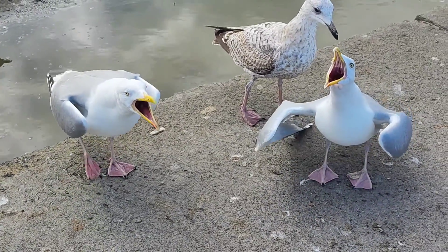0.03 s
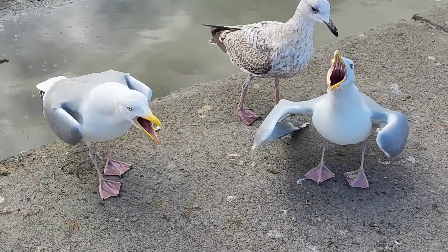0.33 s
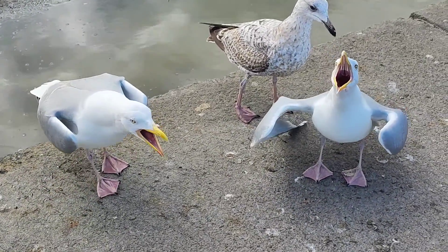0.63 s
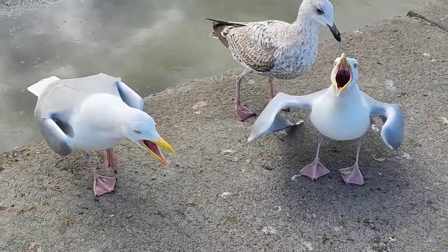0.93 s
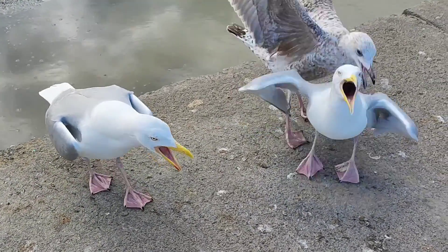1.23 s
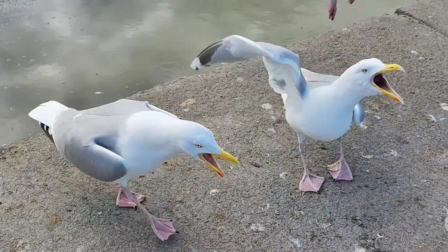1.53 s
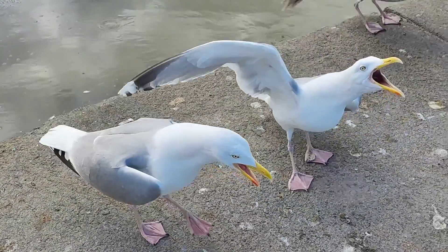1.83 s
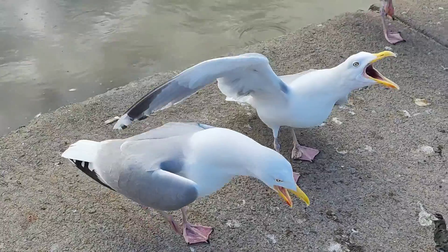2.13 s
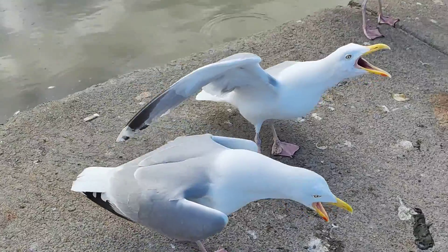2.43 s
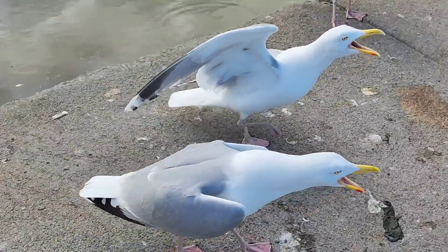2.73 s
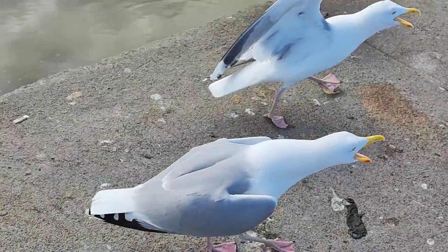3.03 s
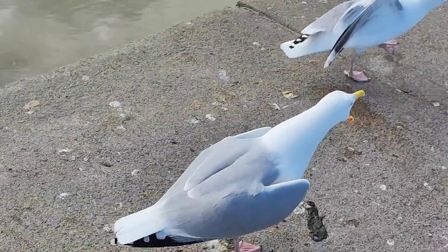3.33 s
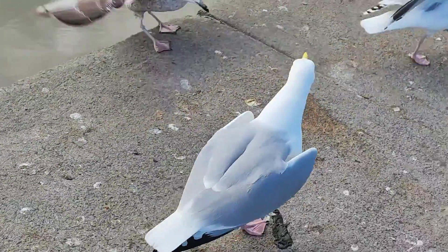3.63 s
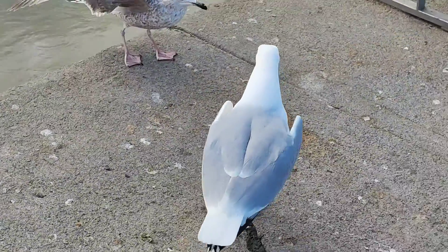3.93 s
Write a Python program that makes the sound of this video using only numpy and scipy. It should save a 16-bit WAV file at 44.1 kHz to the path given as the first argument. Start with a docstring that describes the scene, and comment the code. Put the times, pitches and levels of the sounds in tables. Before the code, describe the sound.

Two gulls call loudly close by from 0.1 seconds, each about three times a second, overlapping. One gives raspy, falling cries, the other sharp yelps that lift and drop. Between 3.2 and 3.6 seconds the yelping gull gives two higher cries and stops, while the first calls on to about 4 seconds. Behind them are a weak echo, three barely audible distant hoots and faint wind rising after 2.5 seconds.

```python
"""Two gulls call against each other, close by on a concrete slipway.
From 0.1 s each call breaks out as a rasp, locks into a clear tone and ends in a croak. The crouching
gull lets its tone fall; the gull with spread wings lifts it, flips into a yelp and drops. After 3.2 s
that gull walks off with two higher cries, while the first calls on to the end and the light wind rises.
Throughout, a weak harbour echo follows the calls; three faint hoots come from far away."""
import sys
import numpy as np
from scipy import signal
from scipy.fft import rfft, irfft
from scipy.io import wavfile
from scipy.ndimage import map_coordinates

SR = 44100
rng = np.random.default_rng(int(sys.argv[2]) if len(sys.argv) > 2 else 0)


def unload_wav(signal):
    """Save mono or channel-first audio to the path in sys.argv[1] as 16-bit WAV at rate SR, clipped to [-1, 1]."""
    wavfile.write(
        sys.argv[1],
        SR,
        np.round(np.clip(np.atleast_2d(signal).T, -1, 1) * 32767).astype(np.int16),
    )


N = 176400

# Cries of the crouching gull; the two highest are the other gull walking off.
# rasp_start_s, tone_start_s, end_s, pitch_hz, rasp_db, tone_db, extra_h2_db, extra_h3_db, extra_upper_db
FALLING_CRIES = [ (0.082, 0.127, .303, 1107, -25.5, -24, 10, 8.5, 6.5),
                 (0.419, .47, .642, 1113, -28, -19, 1.5, 2, 4.5),
                 (0.763, 0.853, .988, 1094, -29, -16, -0.5, 0, 1.5),
                 (1.118, 1.189, 1.33, 1099, -26, -14.5, -2, -5, -4),
                 (1.471, 1.549, 1.68, 1099, -20.5, -17.5, 3, 1, 2),
                 (1.805, 1.897, 2.052, 1078, -24.5, -20, -2, -5.5, 2),
                 (2.213, 2.277, 2.415, 1090, -26.5, -17.5, 1, -1, -4),
                 (2.554, 2.616, 2.763, 1119, -26.5, -15.5, 5, -3.5, -14.5),
                 (2.878, 2.941, 3.086, 1104, -25, -14.5, 0.5, -13.5, -19.5),
                 (3.215, 3.271, 3.421, 1083, -23.5, -21, 3, -7, -7.5),
                 (3.246, 3.278, 3.375, 1138, -30, -12.5, -11.5, -14.5, -9.5),
                 (3.454, 3.498, 3.565, 1275, -38.5, -19.5, 0, -30.5, -9.5),
                 (3.563, 3.626, 3.758, 1100, -24, -16.5, 0.5, -7, -5),
                 (3.879, 3.951, 4.09, 1091, -25, -18.5, 5.5, -10, -1)]
# Calls of the gull with spread wings.
# wail_start_s, fall_start_s, end_s, wail_hz, yelp_hz, fall_hz, rasp_db, wail_db, yelp_db, fall_db,
# hoarse_db, wail_extra_h2_db, wail_extra_upper_db, fall_extra_h2_db, fall_extra_upper_db
YELPING_CALLS = [ (0.122, .207, .268, 1191, 1378, 1103, -17, -15.5, -8.5, -21.5, -32, 5, 1.5, -6.5, -5.5),
                 (0.409, 0.491, .55, 1194, 1335, 1099, -17.5, -15.5, -8, -27.5, -34, 5, 4, 2, 1),
                 (0.693, 0.781, .838, 1181, 1349, 1098, -20, -16.5, -7.5, -28, -30.5, 3, 5.5, 3.5, 0.5),
                 (0.989, 1.066, 1.122, 1192, 1349, 1096, -22.5, -18.5, -7.5, -29, -50, 4.5, 2.5, 5, 2),
                 (1.266, 1.351, 1.407, 1196, 1360, 1092, -22, -19.5, -9, -29.5, -43, 6, 5, 3.5, 2.5),
                 (1.557, 1.651, 1.712, 1297, 1330, 1212, -16.5, -15, -16, -28, -42, -3, 13.5, 0, 0),
                 (1.845, 1.932, 1.988, 1170, 1356, 1109, -18, -20, -9.5, -27.5, -36, 6, 13, 4.5, 0),
                 (2.136, 2.214, 2.276, 1160, 1230, 1103, -21, -30.5, -15, -25, -40, 18, 19.5, 0.5, -4.5),
                 (2.423, 2.498, 2.562, 1147, 1210, 1131, -23.5, -28, -23, -20.5, -48.5, 21, 19, -2, -10),
                 (2.718, 2.794, 2.85, 1156, 1199, 1104, -24.5, -24.5, -17.5, -19.5, -47, 12.5, 12, -9, -12),
                 (3.014, 3.085, 3.138, 1214, 1378, 1128, -27, -19, -18, -18, -41, 5, 9.5, -21, -14)]
# Pitch glides: progress_share, pitch_ratio
CRY_CONTOUR = [(0, 1.055), (.6, .985), (.78, .965), (.9, .92), (1, 0.73)]
WAIL_CONTOUR = [(.25, .968), (1, 1.035)]
FALL_CONTOUR = [(0, 1.025), (.6, .985), (.8, .95), (1, 0.868)]
# Voice spectra, harmonic 1 upwards: relative_db
ONSET_DB = [-3, -20, -22, -30, -44.5, -41.5, -46.5]
OPEN_BEAK_DB = [-2.5, -11.5, -4, -18, -31, -28.5, -28, -39.5, -37.5, -34.5, -38]
LATE_WAIL_DB = [0, -12, -36, -39, -42, -53.5]
FALL_DB = [0, 2.5, 1.5, -7.5, -14.5, -11.5, -14.5, -31, -26, -23.5, -25.5]
# Throat resonances: frequency_hz, relative_db
CRY_FORMANTS = [(300, -28), (720, -17), (1000, 7), (1400, 3.5), (2100, 0), (3400, -9.5), (4400, -22),
                (14000, -44)]
YELP_FORMANTS = [(300, -45.5), (720, -15), (1350, 7), (1850, -6), (2750, -1), (3400, -11.5), (5400, -17.5),
                 (7300, -27), (14000, -45)]
# Two microphone ports: frequency_hz, left_minus_right_db, left_lead_rad
PORT_RESPONSE = [(1150, -2.2, -.7), (2200, -2, -.7), (4200, -6, -1.8), (5400, -3, -1), (6500, 8, -2.4),
                 (7700, -4, -3.2), (12000, 1, -4.4)]
# Distant hoots: middle_s, pitch_hz, level_db
FAR_HOOTS = [(1.17, 389.5, -53), (1.5, 188.6, -48.5), (3.2, 565, -51)]
# Noise spectra: frequency_hz, relative_db
WIND_SPECTRUM = [(124, -3.5), (295, -10), (450, -10), (600, -28.5), (1320, -100)]
AIR_SPECTRUM = [(500, -24.5), (1300, -16), (14000, -41.5)]
# Wind strength: time_s, level_db
WIND_RISE = [(2.5, -46), (4.0, -40)]

HARMONICS, ROLL_OFF_DB, VOICE_TOP_HZ = len(FALL_DB), -6, 12200
CRY_RISE_S, CRY_FADE_S, WAIL_RISE_S, FALL_FADE_S = .008, .03, .024, .019
LIFT_S, YELP_S, FLIP_S = .016, .019, .006
YELP_ARCH = .532  # share of the way back to the wail pitch at the yelp's ends
YELP_DULL_DB = (-2.5, -14.5)  # harmonic 2, upper harmonics
JITTER, JITTER_ENDS, JITTER_HZ, WOBBLE_DB, WOBBLE_HZ = .0055, .011, 346, 3.5, 30
HALF_PITCH_DB, HALF_PITCH_DECAY_S = -21, .025
CRY_HOARSE_DB, HOARSE_FADE_DB = -57, -20.5
# Rasp pairs: start, end. Throat tension scales the base pulse rates.
CRY_BASE_HZ, CRY_SCATTER, CRY_SWELL_DB = (463.6, 564.3), (.11, .04), -7
YELP_BASE_HZ, YELP_SCATTER, YELP_SWELL_DB = (506.8, 633.6), (.2, .14), -15
YELP_RASP_S, RASP_EDGE_S = .041, .0076
RASP_NOISE, RASP_CLIMB, RASP_WANDER = .18, .2, .04
LURCH_HZ, LUMP_HZ, LUMP_DEPTH = 150, 110, .18
CROAK_S, CROAK_DB, CROAK_BASE_HZ = .011, -15, 403.94
PORT_SPREAD = .085  # share by which each bird's port delay departs from the mean
NEAR_DB, NEAR_T60_S, TAIL_DB, TAIL_T60_S, WALL_S, WALL_DB = -11, .015, -27.5, .6, .16, -33.5
GUST_DB, GUST_HZ, AIR_DB, NOISE_CORRELATION = 2.8, 10, -49.5, .68
BAND_LIMIT_HZ = 14500


def falling_cries():
    """Rasp, a sinking tone that brightens as the beak opens, croak."""
    out = np.zeros(N)
    for start_s, lock_s, end_s, pitch_hz, rasp_db, tone_db, *extra_db in FALLING_CRIES:
        add(out, *rasp(start_s, lock_s, rasp_db, CRY_BASE_HZ, CRY_SCATTER, CRY_FORMANTS, CRY_SWELL_DB))
        progress, envelope = section(lock_s, end_s, CRY_RISE_S, CRY_FADE_S)
        beak = ramp(progress)[:, None]
        levels_db = tone_db + (1 - beak) * roll_off(ONSET_DB) + beak * OPEN_BEAK_DB + boost(*extra_db)
        hz = pitch_hz * curve(CRY_CONTOUR, progress)
        add(out, lock_s - CRY_RISE_S / 2, envelope * tone(hz, levels_db, CRY_HOARSE_DB))
        add(out, *croak(end_s, rasp_db, CRY_FORMANTS))
    return out


def yelping_calls():
    """Rasp, rising wail, slide up to a short yelp, flip down into a bright fall, croak."""
    out = np.zeros(N)
    for (lock_s, drop_s, end_s, wail_hz, yelp_hz, fall_hz, rasp_db, wail_db, yelp_db, fall_db,
         hoarse_db, wail_h2_db, wail_upper_db, fall_h2_db, fall_upper_db) in YELPING_CALLS:
        start_s, lift_s = lock_s - YELP_RASP_S, drop_s - YELP_S
        add(out, *rasp(start_s, lock_s, rasp_db, YELP_BASE_HZ, YELP_SCATTER,
                       YELP_FORMANTS, YELP_SWELL_DB))
        progress, envelope = section(lock_s, end_s, WAIL_RISE_S, FALL_FADE_S)
        t = lock_s + progress * (end_s - lock_s)
        spans_s = [(lock_s, lift_s), (lift_s, drop_s), (drop_s, end_s)]
        wail, yelp, fall = (np.clip((t - a) / (b - a), 0, 1) for a, b in spans_s)
        up, down = ramp((t - lift_s) / LIFT_S + .5), ramp((t - drop_s) / FLIP_S + .5)
        shares = [1 - up, up * (1 - down), up * down]  # wail, yelp, fall
        pitches_hz = [wail_hz * curve(WAIL_CONTOUR, wail),
                      yelp_hz - YELP_ARCH * (yelp_hz - wail_hz) * (2 * yelp - 1) ** 2,
                      fall_hz * curve(FALL_CONTOUR, fall)]
        push = ramp(wail)[:, None]
        bright_db = boost(wail_h2_db, wail_upper_db)
        spectra_db = [
            wail_db + (1 - push) * roll_off(ONSET_DB) + push * roll_off(LATE_WAIL_DB) + bright_db,
            yelp_db + roll_off(ONSET_DB) + bright_db + boost(*YELP_DULL_DB),
            fall_db + np.array(FALL_DB) + boost(fall_h2_db, fall_upper_db)]
        gains = sum(share[:, None] * amp(db) for share, db in zip(shares, spectra_db))
        hz = sum(share * pitch for share, pitch in zip(shares, pitches_hz))
        add(out, lock_s - WAIL_RISE_S / 2, envelope * tone(hz, 20 * np.log10(gains), hoarse_db))
        add(out, *croak(end_s, rasp_db, YELP_FORMANTS))
    return out


def tone(hz, levels_db, hoarse_db):
    """Locked voice: harmonics shakiest at the ends, fading half-pitch lines, a hoarse puff per cycle."""
    n = len(hz)
    progress = np.linspace(0, 1, n)
    shake = JITTER + JITTER_ENDS * (2 * progress - 1) ** 4
    phase = 2 * np.pi * np.cumsum(hz * (1 + shake * drift(n, JITTER_HZ))) / SR
    gains = amp(levels_db) / (1 + (np.outer(hz, np.arange(HARMONICS) + 1) / VOICE_TOP_HZ) ** 20)
    voice = sum(gain * amp(WOBBLE_DB * min(k / 2, 1) * drift(n, WOBBLE_HZ)) * np.cos((k + 1) * phase)
                for k, gain in enumerate(gains.T))
    half_pitch = sum(np.cos((k + .5) * phase) / k ** 2 for k in range(1, 5))
    voice += gains[:, 0] * amp(HALF_PITCH_DB) * np.exp(-np.arange(n) / SR / HALF_PITCH_DECAY_S) * half_pitch
    puffs = np.diff(rng.standard_normal(n) * (1 + np.cos(phase)), prepend=0)
    hoarse = amp(hoarse_db + HOARSE_FADE_DB * progress) * throat(puffs, YELP_FORMANTS)
    return np.sqrt(2) * voice + hoarse


def rasp(start_s, end_s, level_db, base_hz, scatter, formants, swell_db):
    """Uneven pulses swell and speed up as the throat's resonances climb. Returns start_s, sound."""
    t = np.arange(0, end_s - start_s + RASP_EDGE_S, 1 / SR)
    n, progress = len(t), np.minimum(t / (end_s - start_s), 1)
    lurch = np.interp(progress, [0, 1], scatter) * drift(n, LURCH_HZ)
    cycles = np.cumsum(np.interp(progress, [0, 1], base_hz) * (1 + lurch)) / SR
    pulses = unit(np.diff(np.floor(cycles), prepend=0)) + RASP_NOISE * rng.standard_normal(n)
    voice = throat(pulses * np.exp(LUMP_DEPTH * drift(n, LUMP_HZ)), formants)
    tension = 1 - RASP_CLIMB * (1 - progress) + RASP_WANDER * drift(n, LUMP_HZ / 2)
    voice = map_coordinates(voice, [np.cumsum(tension)], mode="mirror")  # scales all frequencies
    envelope = ramp(t / RASP_EDGE_S) * ramp((t[-1] - t) / RASP_EDGE_S)
    return start_s, amp(level_db + swell_db * (1 - progress) ** 2) * envelope * voice


def croak(end_s, rasp_db, formants):
    """The voice breaks up again as the call runs out."""
    base_hz = (CROAK_BASE_HZ, CROAK_BASE_HZ)
    return rasp(end_s - CROAK_S, end_s, rasp_db + CROAK_DB, base_hz, YELP_SCATTER, formants, swell_db=0)


def throat(drive, formants, size=2048):
    """Throat resonances as a minimum-phase filter; output at rms 1."""
    log_gain = np.log(amp(spectrum(formants, abs(np.fft.fftfreq(size, 1 / SR)))))
    ring = np.fft.ifft(np.exp(np.conj(signal.hilbert(log_gain)))).real
    return unit(signal.fftconvolve(drive, ring)[:len(drive)])


def ports(bird, side):
    """Each microphone port hears a bird with its own colour and delay; the birds stand apart."""
    hz = np.fft.rfftfreq(2 * N, 1 / SR)
    lead_rad = (1 + side * PORT_SPREAD) * spectrum(PORT_RESPONSE, hz, column=2)
    left = amp(spectrum(PORT_RESPONSE, hz) / 2) * np.exp(.5j * lead_rad)
    rms_gain = np.sqrt((abs(left) ** 2 + abs(left) ** -2) / 2)
    return irfft(rfft(bird, 2 * N) * np.array([left, 1 / left]) / rms_gain)[:, :N]


def harbour(calls):
    """Scatter from nearby ground, a thin open-air tail, one far wall."""
    t = np.arange(SR) / SR
    response = np.zeros((2, SR))
    for channel in response:
        for db, t60_s in [(NEAR_DB, NEAR_T60_S), (TAIL_DB, TAIL_T60_S)]:
            decay = unit(rng.standard_normal(SR) * np.exp(-np.log(1000) * t / t60_s))
            add(channel, .004, amp(db) * decay / np.sqrt(SR))
        add(channel, WALL_S, amp([WALL_DB]))
    return signal.fftconvolve(calls[None], response, axes=1)[:, :N]


def wind():
    """Low gusty wind, slightly stronger on the right."""
    gust_band = np.exp(-(np.fft.rfftfreq(N, 1 / SR) / GUST_HZ) ** 2)
    gusts = unit(irfft(rfft(rng.standard_normal(N)) * gust_band, N))
    level_db = curve(WIND_RISE, np.arange(N) / SR) + GUST_DB * gusts
    return noise(WIND_SPECTRUM) * amp(level_db) * amp([[-1], [1]])


def hoots():
    """Soft, slightly sinking tones from far away."""
    length_s, sag = .3, .097
    out, position = np.zeros(N), np.linspace(-.5, .5, int(length_s * SR))
    for middle_s, hz, db in FAR_HOOTS:
        phase = 2 * np.pi * np.cumsum(hz * (1 - sag * position)) / SR
        add(out, middle_s - length_s / 2, 2 * amp(db) * np.cos(np.pi * position) ** 2 * np.sin(phase))
    return out


def air():
    """Steady hiss of still air."""
    return amp(AIR_DB) * noise(AIR_SPECTRUM)


def noise(colour):
    """Coloured stereo noise, partly shared by the ports."""
    left, other = rfft(rng.standard_normal((2, N)))
    right = NOISE_CORRELATION * left + np.sqrt(1 - NOISE_CORRELATION ** 2) * other
    return unit(irfft(np.array([left, right]) * amp(spectrum(colour, np.fft.rfftfreq(N, 1 / SR))), N))


def section(start_s, end_s, rise_s, fade_s):
    """Progress 0-1 and envelope of a tone, overlapping its neighbours slightly."""
    t = np.arange(-rise_s / 2, end_s - start_s + FLIP_S / 2, 1 / SR)
    return np.clip(t / (end_s - start_s), 0, 1), ramp(t / rise_s + .5) * ramp((t[-1] - t) / fade_s)


def roll_off(levels_db):
    """Extends a spectrum by ROLL_OFF_DB per harmonic."""
    k, last = np.arange(HARMONICS), len(levels_db) - 1
    return np.array(levels_db)[np.minimum(k, last)] + ROLL_OFF_DB * np.maximum(k - last, 0)


def boost(*overtones_db):
    """Extra dB from harmonic 2 up; the last value holds for the rest."""
    return np.pad([0, *overtones_db], (0, HARMONICS - 1 - len(overtones_db)), "edge")


def drift(n, cutoff_hz):
    """Smooth random motion, rms about 1."""
    hz = np.fft.rfftfreq(2 ** 14, 1 / SR)
    return np.resize(unit(irfft(rfft(rng.standard_normal(2 ** 14)) / (1 + (hz / cutoff_hz) ** 4))), n)


def spectrum(points, hz, column=1):
    """Table lookup over log frequency."""
    table = np.transpose(points)
    return np.interp(np.log(hz + 1), np.log(table[0] + 1), table[column])


def curve(points, x):
    """Linear table lookup."""
    return np.interp(x, *np.transpose(points))


def ramp(x):
    """Soft step from 0 to 1."""
    return np.sin(np.pi / 2 * np.clip(x, 0, 1)) ** 2


def amp(db):
    """Decibels to gain."""
    return 10 ** (np.asarray(db) / 20)


def unit(x):
    """Scales to rms 1."""
    return x / np.sqrt(np.mean(x ** 2) + 1e-20)


def add(mix, start_s, sound):
    """Mixes a sound in at start_s."""
    part = mix[max(round(start_s * SR), 0):][:len(sound)]
    part += sound[:len(part)]


def scene():
    """Both gulls, their echo and the waterside background."""
    cries, yelps = falling_cries(), yelping_calls()
    gulls = ports(cries, side=-1) + ports(yelps, side=1)
    return gulls + harbour(cries + yelps) + wind() + hoots() + air()


def record(dry):
    """The recorder's band limit."""
    lowpass = signal.firwin(511, BAND_LIMIT_HZ, window=("kaiser", 9), fs=SR)
    return signal.oaconvolve(dry, lowpass[None], "same")


dry = scene()
out = record(dry)
unload_wav(out)
```